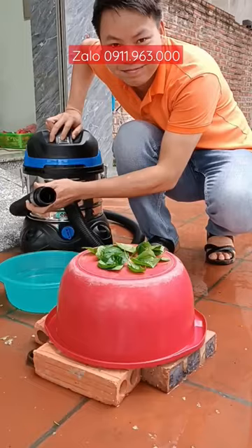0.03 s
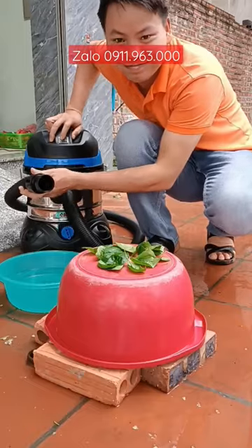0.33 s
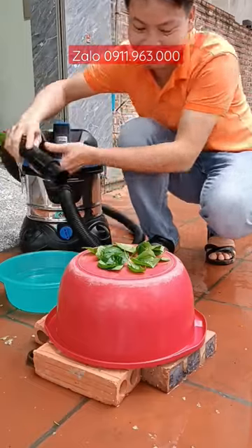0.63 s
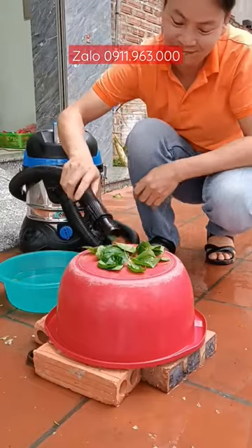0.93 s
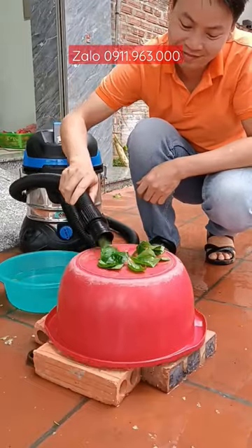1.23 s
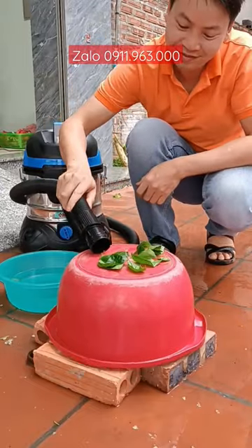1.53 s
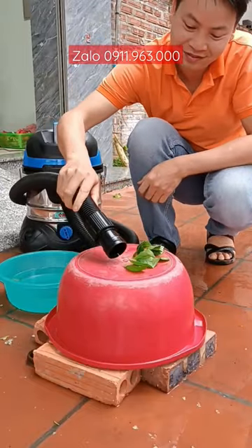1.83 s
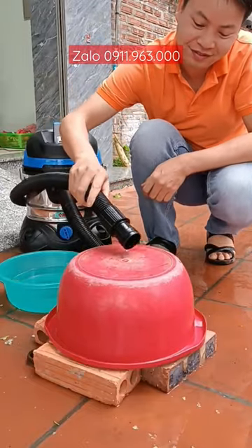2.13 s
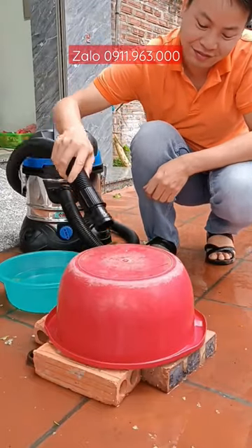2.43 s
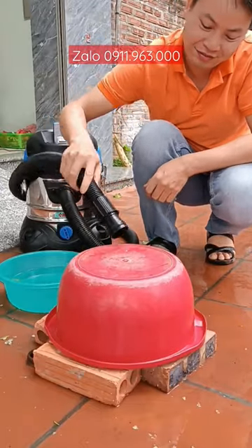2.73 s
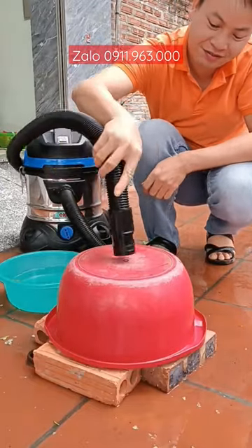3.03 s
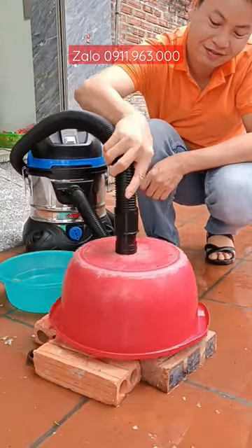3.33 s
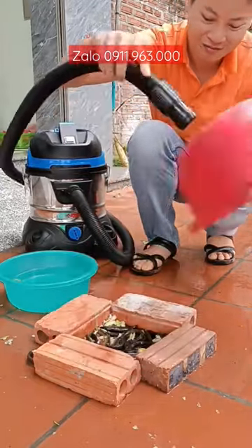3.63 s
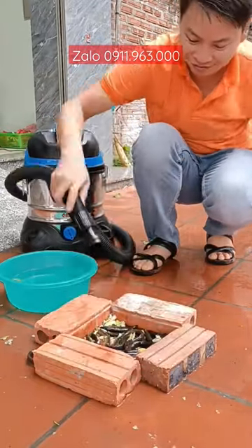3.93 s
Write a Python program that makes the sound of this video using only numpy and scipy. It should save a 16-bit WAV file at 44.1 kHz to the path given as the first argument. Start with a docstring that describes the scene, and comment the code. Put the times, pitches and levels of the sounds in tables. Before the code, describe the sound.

A vacuum cleaner starts and whines, its pitch shifting as the nozzle sucks leaves, then seals.

```python
"""A wet-dry vacuum cleaner is switched on, on a patio. The motor hums and squeals, winds up in a rush
of air, then sings on its shaft tone with a twelve-blade whine. Near 1 s the pitch steps down, and
leaves are sucked off an upturned plastic basin, crackling and making the hose boom. Near 3.3 s the
pitch steps up and the nozzle seals on the basin with a pop. Air hisses to the end."""
import sys
import numpy as np
from scipy import signal
from scipy.fft import rfft, irfft
from scipy.io import wavfile
from scipy.ndimage import uniform_filter1d

SR = 44100
rng = np.random.default_rng(int(sys.argv[2]) if len(sys.argv) > 2 else 0)


def file_out(sig):
    """Save sig as 16-bit WAV at sys.argv[1]."""
    # one column per channel
    cols = np.atleast_2d(sig).T
    # limit, then scale
    lim = np.clip(cols, -1, 1)
    pcm = np.round(lim * 32767).astype(np.int16)
    wavfile.write(sys.argv[1], SR, pcm)


N = 176400
SWITCH_S, SPIN_UP_S, SUCKING_S, SEAL_S, TIGHT_S, SWELL_S = 0.11, 0.2374, 0.958, 3.257, 3.32, 3.64
WORKING_HZ, BLADES = 727, 12
WIDE_HZ = 2300  # above this, noise is mostly uncorrelated between the ears


def undb(db):
    """Amplitude ratio of a level in decibels."""
    return 10 ** (np.asarray(db) / 20)


def times():
    """Sample times in seconds."""
    return np.arange(N) / SR


def curve(table, t):
    """Linear interpolation in time."""
    return np.interp(t, *np.array(table, float).T)


def spectrum_db(table, hz):
    """Interpolation of level over log frequency."""
    f, db = np.array(table, float).T
    return np.interp(np.log(hz), np.log(f), db)


def ramp(t, start, length):
    """Linear rise from 0 to 1."""
    return np.clip((t - start) / length, 0, 1)


def pan(db):
    """Constant-power gains for a level difference, left minus right."""
    gains = np.array([undb(db / 2), undb(-db / 2)]).reshape(2, -1)
    return gains / np.sqrt(np.mean(gains ** 2, axis=0))


def wander(rate_hz):
    """Low-pass random modulation with a spread near 1."""
    span = max(int(SR / rate_hz), 2)
    steps = rng.standard_normal(4096)
    return 1.3 * uniform_filter1d(np.interp(np.arange(N) / span, np.arange(len(steps)), steps), span)


def band(hz, width_hz):
    """White noise filtered by one steep resonance, rms 1."""
    f = np.arange(N // 2 + 1) * SR / N
    noise = irfft(rfft(rng.standard_normal(N)) / (1 + ((f - hz) / width_hz) ** 2) ** 3, N)
    return noise / noise.std()


def motor():
    """Phase locking: the motor's partials all follow one slightly jittering fundamental."""
    t = times()
    phase = 2 * np.pi * np.cumsum(motor_pitch_hz(t) * (1 + 0.0011 * wander(50))) / SR
    shaft = shaft_tone(t, phase)
    upper = blade_whine(t, phase) + harmonics(t, phase)
    return shaft * ramp(t, SPIN_UP_S, 0.0032) + upper * ramp(t, SPIN_UP_S, 0.18) ** 2


# Pitch of the motor tone in its three stages. Each row: time in seconds, frequency in Hz.
RUN_UP_PITCH = [(0.24, 434.1), (0.269, 609.4), (0.299, 709.8), (0.349, 805), (0.421, 871), (0.495, 894.5),
                (0.685, 909), (0.955, 923)]
LOW_PITCH = [(0.958, 691.2), (1.5, 704.5), (3.255, 710.1)]
HIGH_PITCH = [(3.257, 1033), (3.32, 1036), (3.4, 1063), (3.5, 1102), (3.62, 1125), (3.77, 1141), (4, 1044)]

def motor_pitch_hz(t):
    """Fundamental frequency: it glides within each stage, and steps down near 1 s and up near 3.3 s."""
    return np.select([t < SUCKING_S, t < SEAL_S],
                     [curve(RUN_UP_PITCH, t), curve(LOW_PITCH, t)], curve(HIGH_PITCH, t))


# Envelope of the shaft tone. Each row: time in seconds, level in dB.
SHAFT_DB = [(0.245, -24.5), (0.34, -17.5), (0.46, -17.5), (0.49, -22.5), (0.6, -22.5), (0.7, -42),
            (0.77, -33.5), (0.88, -45), (0.98, -25), (1.1, -17), (1.37, -16.5), (1.395, -22.5),
            (1.9, -28.5), (1.92, -34.5), (1.95, -30), (2.095, -28.5), (2.11, -34.5), (2.42, -32),
            (2.92, -35), (3.02, -43.5), (3.1, -31.5), (3.36, -36.5), (3.41, -9.5), (3.56, -18.5),
            (3.61, -15), (3.67, -24.5), (3.72, -17), (3.76, -14), (3.785, -58), (3.87, -23.5), (4, -29)]
# Its direction. Each row: time in seconds, left minus right level in dB.
SHAFT_BALANCE = [(.65, -1), (.97, -14.5), (1.15, -0.5), (3.2, 5), (3.42, -1.5), (3.57, -7), (3.75, 5.5),
                 (3.88, 9), (4, 1)]

def shaft_tone(t, phase):
    """Amplitude modulation roughens the fundamental in the run-up and as the seal forms."""
    lead_rad = np.array([[0.37], [0]])
    level = undb(curve(SHAFT_DB, t) + 0.45 * wander(45.14))
    tone = np.sqrt(2) * level * np.sin(phase + lead_rad) * pan(curve(SHAFT_BALANCE, t))
    gripping = (t > SEAL_S) & (t < TIGHT_S)
    depth = 0.14 * (t <= SUCKING_S) + 0.28 * gripping
    return tone * (1 + depth * wander(220))


# Envelopes of the sixth harmonic and the blade tone. Each row: time in seconds, level in dB.
SIXTH_DB = [(0.94, -39.5), (0.965, -38), (1.17, -34), (1.36, -56), (2.12, -51), (2.165, -33), (2.22, -56),
            (2.38, -54), (2.54, -33.5), (2.78, -56.5), (2.92, -37), (3.01, -63), (3.1, -41.5), (3.36, -42),
            (3.42, -56), (3.55, -42.5)]
BLADE_DB = [(0.55, -43), (0.78, -33.5), (0.98, -38), (1.03, -30), (1.12, -48), (1.3, -42.5), (2.1, -44.5),
            (2.28, -31), (2.52, -33.5), (2.67, -40), (2.75, -31), (2.92, -30.5), (2.98, -41), (3.22, -44),
            (3.36, -31.5), (3.62, -37), (3.72, -25.5), (3.84, -31), (3.98, -23)]

def blade_whine(t, phase):
    """The blade-passing tone and the octave below it flutter, and turn airy as the pitch rises."""
    skirt_db = -9 + 24 * (motor_pitch_hz(t) - WORKING_HZ) / 1000
    flutter_db = np.where((t > SUCKING_S) & (t <= SEAL_S), 2.25, 4.5)
    sixth_db = curve(SIXTH_DB, t) + flutter_db * (wander(30) - 0.5)
    sixth = partial(6 * phase, sixth_db, skirt_db, drift_rad=0.28)
    blade_db = curve(BLADE_DB, t) + flutter_db * (wander(30) - 0.5)
    blade = partial(BLADES * phase, blade_db, skirt_db, drift_rad=0.83)
    return sixth + blade * pan(-4.5)


# Envelope of the third harmonic. Each row: time in seconds, level in dB.
THIRD_DB = [(0.3, -37.5), (0.8, -32.5), (0.95, -46.5), (1.14, -39.5), (1.38, -38.5), (1.5, -49.5),
            (3.28, -45), (3.37, -26), (3.46, -52), (3.58, -30.5), (3.75, -35.5), (3.8, -54), (3.92, -31.5),
            (4, -50)]
# Weaker harmonics. Each row: harmonic number, then level in dB in the run-up, while sucking leaves,
# once sealed and after SWELL_S.
WEAK_HARMONICS = [(2, -38, -44, -52, -38), (4, -39, -49, -64, -51), (5, -53, -53, -69, -53)]

def harmonics(t, phase):
    """Harmonic series: whole multiples of the fundamental, most blurred in the run-up."""
    stage = np.searchsorted([SUCKING_S, SEAL_S, SWELL_S], t)
    skirt_db = np.where(stage == 0, -2, -9)
    out = partial(3 * phase, curve(THIRD_DB, t), skirt_db)
    for number, *levels in WEAK_HARMONICS:
        db = uniform_filter1d(np.array(levels, float)[stage], size=2000)
        out += partial(number * phase, db, skirt_db, fading_db=3.5)
    return out


def partial(phase, db, skirt_db, drift_rad=0.56, fading_db=1.8):
    """Spectral broadening: turbulence gives a tone a noise skirt; it fades and drifts at each ear."""
    start_rad = rng.uniform(0, 2 * np.pi)
    ears = []
    for lead_rad in (1.17, 0):
        tone = np.exp(1j * (start_rad + lead_rad + drift_rad * wander(70)))
        skirt = undb(skirt_db) * (wander(256.8) + 1j * wander(256.8)) / np.sqrt(2)
        level = undb(db + fading_db * wander(22))
        ears.append(level * np.imag((tone + skirt) * np.exp(1j * phase)))
    return np.sqrt(2 / (1 + undb(skirt_db) ** 2)) * np.array(ears)


# Leaves choking the nozzle. Each row: start in seconds, length in seconds, initial pitch in Hz,
# level in dB.
CHOKES = [(1.14, 0.034, 333.6, -28.5), (1.243, 0.042, 210, -35), (1.302, 0.03, 219.6, -26),
          (1.355, 0.032, 205, -28), (1.425, 0.1, 209, -26), (1.594, 0.043, 204, -24.5),
          (1.638, 0.042, 259, -26), (1.768, 0.042, 205, -27.5), (2.069, 0.037, 209, -23.5),
          (2.351, 0.055, 211, -24)]

def hose_booms():
    """Forced vibration: a fluttering leaf drives two hose modes, which rise in pitch as it lets go."""
    t, out = times(), np.zeros(N)
    roughness = 1 + 0.19 * wander(150)
    rumble = undb(-7) * band(261, 179.4)
    for start, length, hz, db in CHOKES:
        progress = ramp(t, start, length)
        pitch_hz = hz * (1 + 0.16 * progress ** 4) * (progress > 0)
        phase = 2 * np.pi * np.cumsum(pitch_hz) / SR
        modes = np.sqrt(2) * (np.sin(phase) + undb(-17) * np.sin(phase / 2))
        swell = np.sqrt(np.abs(np.sin(np.pi * progress ** 1.19)))  # builds more slowly than it ends
        out += undb(db) * swell * (modes * roughness + rumble)
    return out


# Leaves snapping against the nozzle. Each row: start in seconds, level in dB.
LEAF_SNAPS = [(1.335, -39), (1.387, -38), (1.608, -32), (1.935, -27), (1.99, -37), (2.195, -33)]

def leaf_crackles():
    """Each impact is a bright noise burst with exponential decay; a ragged rustle runs between them."""
    t, decay_s = times(), 0.014
    rustling = (t > LEAF_SNAPS[0][0]) & (t < LEAF_SNAPS[-1][0])
    envelope = undb(-48 + 4 * wander(150)) * rustling
    for start, db in LEAF_SNAPS:
        envelope += undb(db) * (t >= start) * np.exp(-np.maximum(t - start, 0) / decay_s)
    return envelope * np.array([band(5550, 580) for ear in range(2)])


# The nozzle clears or grips the basin. Each row: start in seconds, frequency in Hz, relative level
# in dB, time to decay by 60 dB in seconds.
PRESSURE_STEPS = [(2.3608, 230, -5.5, 0.04), (3.2801, 562, -8.5, 0.06), (3.295, 438, -16.5, 0.085)]

def nozzle_pops():
    """Damped oscillation: each sudden pressure step rings briefly."""
    out, attack_s = np.zeros(N), 0.0024
    for start, hz, db, t60 in PRESSURE_STEPS:
        age = np.maximum(times() - start, 0)
        decay = np.exp(-np.log(1000) * np.minimum(age / t60, 10))
        out += undb(db) * ramp(age, 0, attack_s) * decay * np.sin(2 * np.pi * hz * age)
    return out


# Motor squeals, hose hoots and nozzle whistles. Each row: centre in seconds, half-length in seconds,
# frequency in Hz, width parameter in Hz, level in dB.
RESONANCES = [(0.138, 0.045, 5260, 1200, -33.5), (0.174, 0.082, 6080, 960, -33),
              (0.244, 0.1, 5790, 220, -30), (0.471, 0.12, 328, 38.3, -29.5), (1.794, 0.053, 5030, 350, -38),
              (2.091, 0.014, 3440, 150, -29), (2.364, 0.035, 488, 170.7, -23.5),
              (2.378, 0.059, 930, 197, -37), (3.322, 0.025, 1223, 160, -32),
              (3.778, 0.021, 10900, 700, -29.5)]

def whistles():
    """Narrow resonances excited by noise swell and die away."""
    t, out = times(), np.zeros((2, N))
    for centre, half_length, hz, width_hz, db in RESONANCES:
        left, independent = band(hz, width_hz), band(hz, width_hz)
        coherence = 1 / (1 + (hz / WIDE_HZ) ** 2)
        right = coherence * left + np.sqrt(1 - coherence ** 2) * independent
        swell = np.cos(np.pi / 2 * np.clip((t - centre) / half_length, -1, 1)) ** 2
        out += undb(db) * swell * np.array([left, right])
    return out * ramp(t, SWITCH_S, 0.003)


# Spectra of the hiss at the working pitch and of the opening rush. Each row: frequency in Hz, relative
# spectral density in dB.
HISS_SPECTRUM = [(60, -88.5), (110, -73.5), (220, -64.5), (400, -68), (1600, -75.5), (2200, -71.5),
                 (3200, -75), (10500, -78), (13000, -84), (15200, -87)]
RUSH_SPECTRUM = [(120, -85), (330, -88), (500, -62.5), (2800, -59.5), (4500, -64), (15200, -66.5)]
# Strength of the hiss. Each row: time in seconds, gain in dB.
HISS_GAIN = [(2.08, 2), (2.12, -0.5), (2.2, 2), (2.92, 0.1), (3.02, -3.5), (3.1, 3.5), (3.33, -0.5),
             (3.45, -5.5), (3.56, -0.5), (3.79, 2), (4.0, -1)]

def airflow():
    """Broadband flow noise: a bright opening rush adds in power to a hiss that shifts up with pitch."""
    def density(hz, t):
        pitch_ratio = np.maximum(motor_pitch_hz(t) / WORKING_HZ, 1)
        hiss_db = spectrum_db(HISS_SPECTRUM, hz / pitch_ratio) + curve(HISS_GAIN, t) - 1.5
        hiss = undb(hiss_db) * ramp(t, 0.17, 0.074)
        crest_s, release_s, growth_db_per_s = 0.636, 0.057, 9
        rush_db = spectrum_db(RUSH_SPECTRUM, hz) - 9.5 + growth_db_per_s * np.minimum(t, crest_s)
        release = np.exp(-np.maximum(t - crest_s, 0) / release_s)
        rush = undb(rush_db) * ramp(t, SPIN_UP_S, 0.052) * release
        return np.hypot(hiss, rush)
    return air_noise(density) * undb(1.11 * wander(35.04))


def air_noise(density, flicker_db=3):
    """Flickering noise shaped by density(hz, t); coherence between the ears falls with frequency."""
    size, hop = 1024, 256
    hz = np.maximum(np.arange(size // 2 + 1) * SR / size, 10)[:, None]
    t = np.arange(N // hop + 2) * hop / SR
    shape = (len(hz), len(t))
    flicker = uniform_filter1d(rng.standard_normal(shape), size=9, axis=0)
    flicker = uniform_filter1d(flicker, size=9, axis=1)
    gain = density(hz, t) * undb(flicker_db * flicker / flicker.std())
    mid, side = (rng.standard_normal(shape) + 1j * rng.standard_normal(shape) for _ in range(2))
    coherence = 0.985 / (1 + (hz / WIDE_HZ) ** 2)
    mid *= np.sqrt((1 + coherence) / 2)
    side *= np.sqrt((1 - coherence) / 2)
    noise = signal.istft(gain * np.array([mid + side, mid - side]), nperseg=size, noverlap=size - hop)[1]
    return noise[:, :N] * np.sqrt(1.5 * SR / size)


def switch_on_hum():
    """Starting transient: a wavering electric hum and a faint fizz of the brushes as the switch closes."""
    t = times()
    level = undb(-45 + 2 * wander(16.2)) * ramp(t, SWITCH_S, 0.11) * (1 - ramp(t, 0.765, 0.13))
    hum_hz = 164 + 6.1 * wander(23.2)
    hum = np.sqrt(2) * level * np.sin(2 * np.pi * np.cumsum(hum_hz) / SR)
    fizz = undb(-53.5) * band(290, 2300)
    return hum + fizz * ramp(t, SWITCH_S, 0.0036) * (1 - ramp(t, SPIN_UP_S, 0.092))


def scene():
    """Superposition of the direct sound of machine and nozzle, close by in the open air."""
    return (motor() + hose_booms() + leaf_crackles() + nozzle_pops() + whistles()
            + airflow() + switch_on_hum())


def record(dry):
    """A steep low-pass filter removes the treble above 15.6 kHz."""
    return signal.sosfilt(signal.ellip(10, 0.2, 80, 15600, fs=SR, output="sos"), dry)


dry = scene()
out = record(dry)
file_out(out)
```